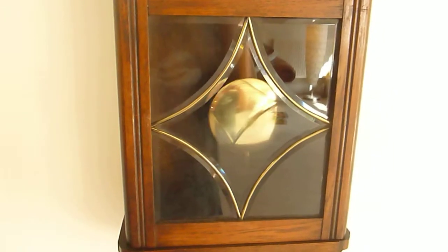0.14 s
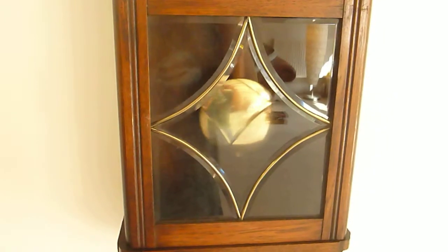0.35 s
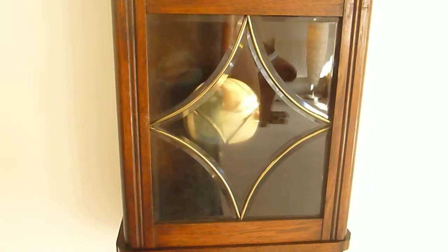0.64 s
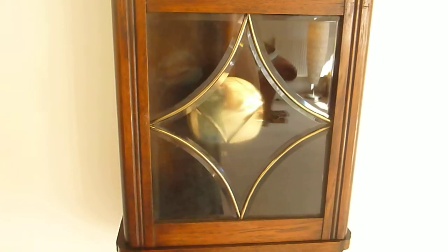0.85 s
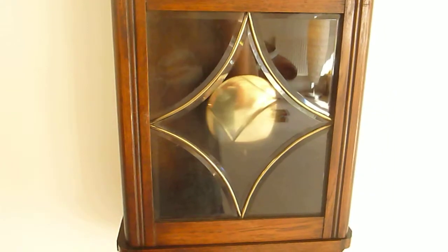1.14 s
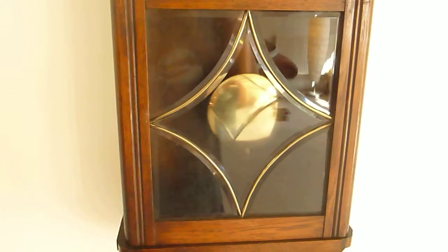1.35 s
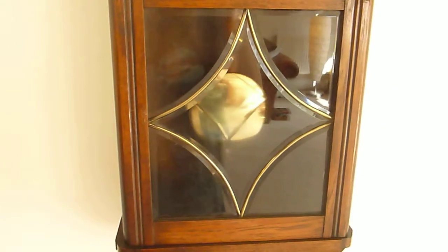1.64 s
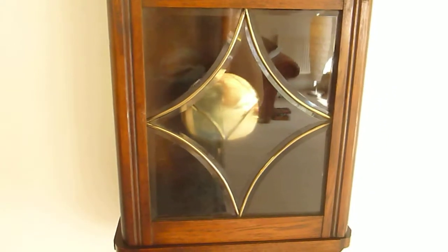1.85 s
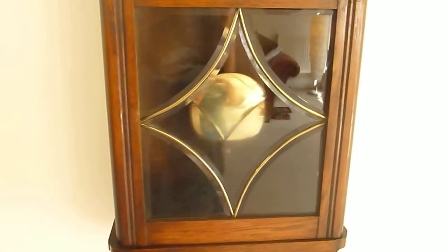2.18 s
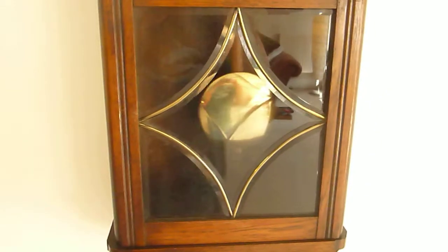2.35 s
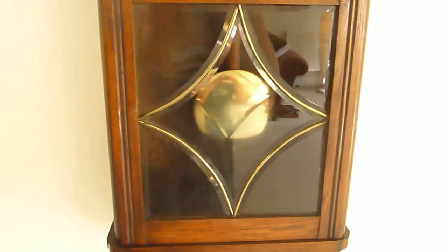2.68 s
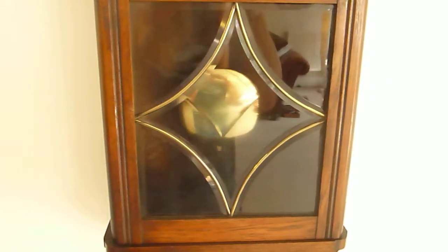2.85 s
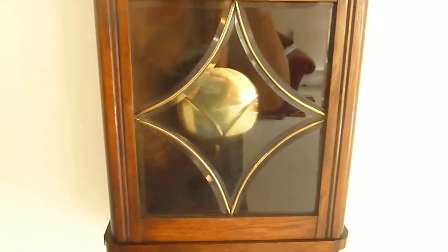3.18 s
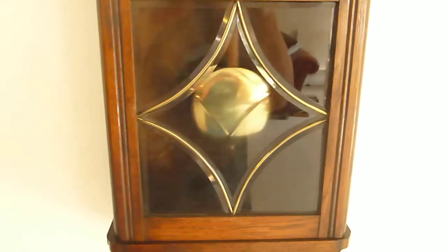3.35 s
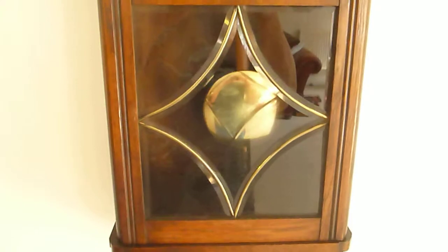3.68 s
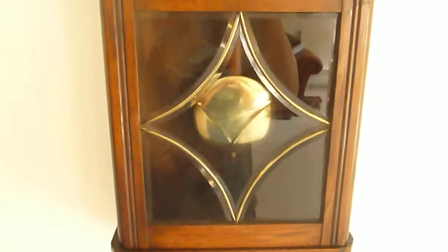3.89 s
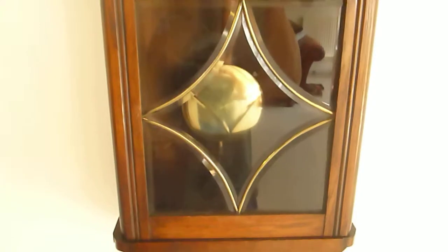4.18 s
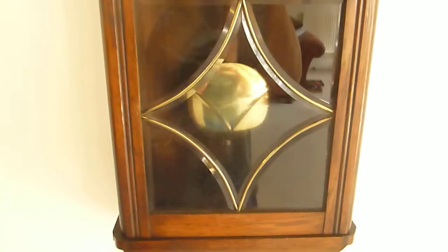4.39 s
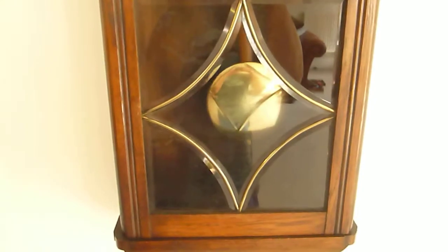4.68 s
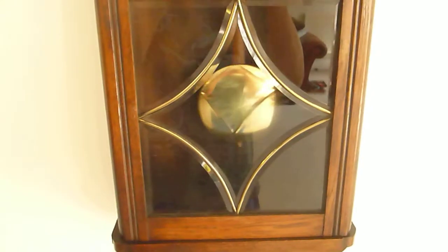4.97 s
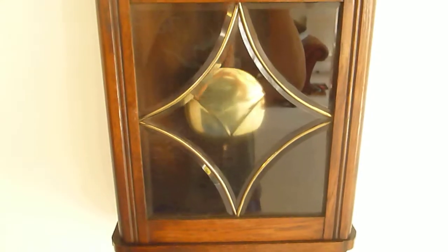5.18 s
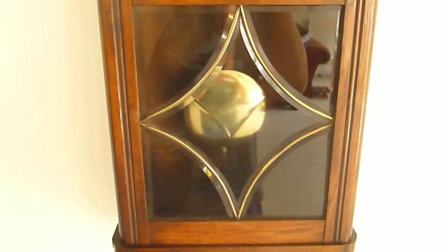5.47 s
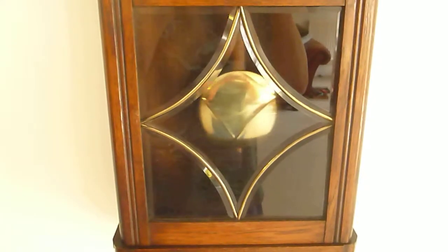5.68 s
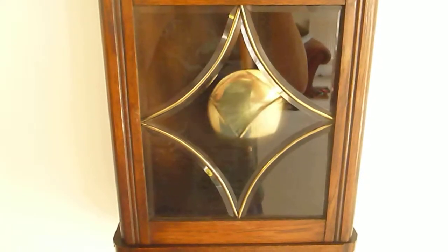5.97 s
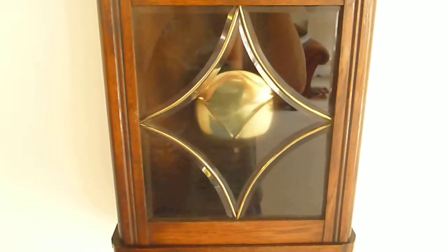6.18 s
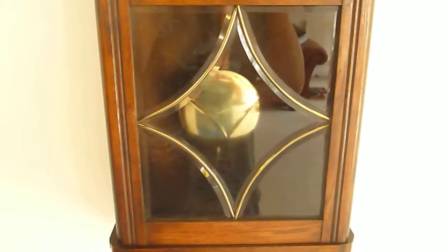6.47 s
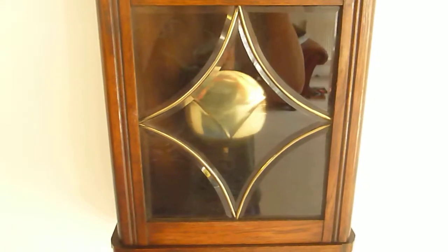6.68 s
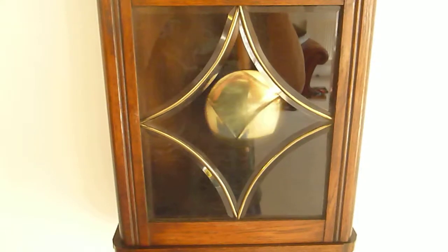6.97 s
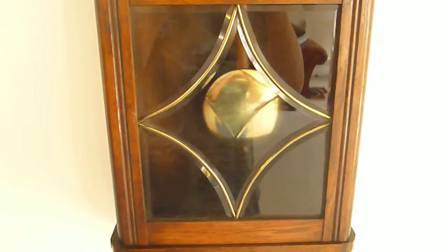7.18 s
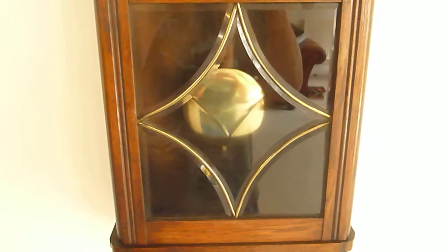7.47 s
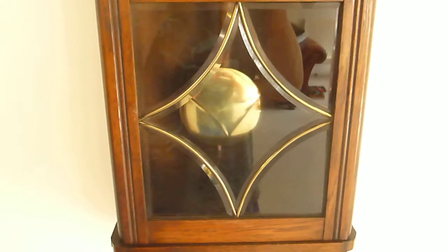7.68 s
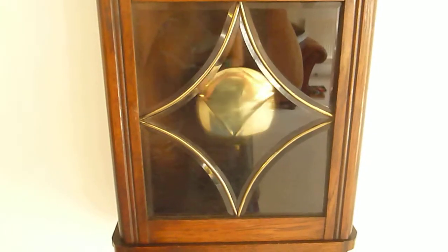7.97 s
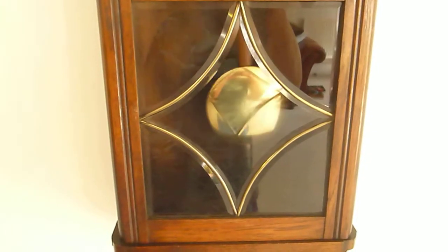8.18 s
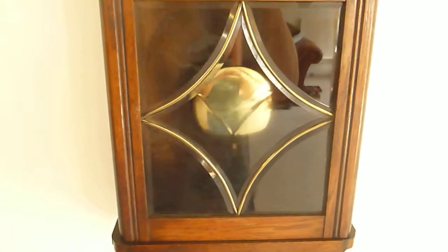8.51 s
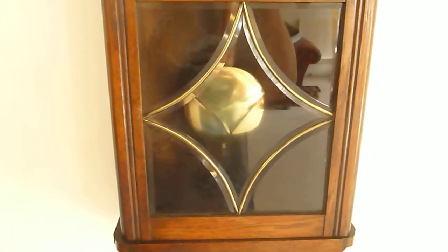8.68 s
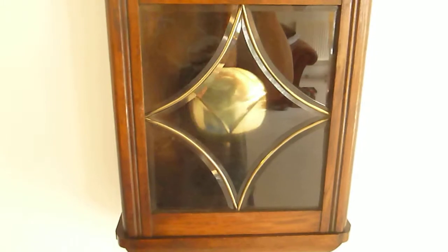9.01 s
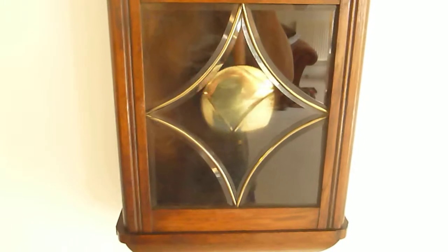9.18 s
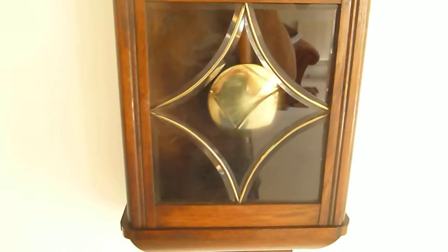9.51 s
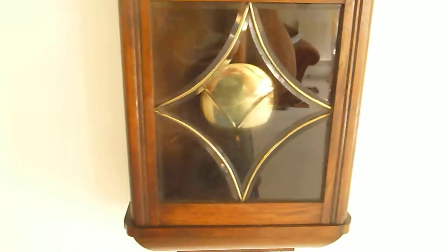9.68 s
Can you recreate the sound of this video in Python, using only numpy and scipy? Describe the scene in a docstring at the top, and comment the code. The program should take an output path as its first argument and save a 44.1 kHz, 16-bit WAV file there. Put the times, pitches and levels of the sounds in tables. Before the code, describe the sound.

Two clocks tick indoors over faint hiss, one a slow wooden tick-tock, the other faster with a thin ring.

```python
"""A wooden pendulum wall clock beats a strong tick and a softer tock in a quiet room.
A smaller, quicker clock ticks nearby with a thin ring, drifting in and out of step with it.
Each beat is an escapement tooth sliding off one pallet and the wheel landing on the other,
ringing movement and case. Under both lie room noise, hiss and a faint hum;
near the end something brushes softly."""
import sys
import numpy as np
from scipy import signal
from scipy.fft import rfft, irfft, next_fast_len
from scipy.io import wavfile

SR = 44100
rng = np.random.default_rng(int(sys.argv[2]) if len(sys.argv) > 2 else 0)


def int16_out(signal):
    """Quantize to a 16-bit WAV file."""
    q = np.round(np.clip(np.atleast_2d(signal).T, -1, 1) * 32767)
    wavfile.write(sys.argv[1], SR, q.astype(np.int16))


N = 434385


def gain_of(db):
    """Decibels to amplitude."""
    return 10 ** (np.asarray(db) / 20)


def unit_rms(x):
    """Scale to rms 1."""
    return x / np.sqrt(np.mean(x ** 2) + 1e-20)


def curve_at(points, hz):
    """Interpolate (freq_hz, value) rows over log frequency."""
    freq_hz, value = np.transpose(points)
    return np.interp(np.log(hz + 1), np.log(freq_hz + 1), value)


def coloured(x, spectrum):
    """Filter by (freq_hz, gain_db) rows."""
    size = next_fast_len(len(x))
    response = gain_of(curve_at(spectrum, np.fft.rfftfreq(size, 1 / SR)))
    return irfft(rfft(x, size) * response, size)[:len(x)]


def drift(max_hz):
    """Slow random wander, rms 1."""
    t = np.arange(N) / SR
    rates_hz = max_hz * rng.random(size=8)
    return unit_rms(sum(np.sin(2 * np.pi * (hz * t + rng.random())) for hz in rates_hz))


def add(mix, start_s, sound):
    """Mix in a sound, cropped at both ends of the mix."""
    start = round(start_s * SR)
    sound = sound[max(-start, 0):]
    part = mix[max(start, 0):][:len(sound)]
    part += sound[:len(part)]


def room_noise(level_db=-52.5):
    """Steady, dull room noise thinning into hiss."""
    # noise floor: freq_hz, density_db
    spectrum = [(20, -8), (70, -5.5), (140, -1), (245, 0), (285, -2), (320, 2), (380, -3.5), (500, -6),
                (1000, -10), (1600, -13.5), (2400, -17.5), (3200, -21), (4800, -24.5), (7100, -27.5)]
    return gain_of(level_db) * unit_rms(coloured(rng.standard_normal(N), spectrum))


def mains_hum(swell_db=0.3):
    """Faint mains and appliance tones, wavering in pitch and level."""
    # tones: pitch_hz, rms_db, waver_hz
    tones = [(55, -70.5, 1.8), (100, -63, 1.1), (120, -73, .8), (627, -78, .5), (797, -71, .6),
             (4388, -90, .4), (6666, -93.5, .3)]
    out = np.zeros(N)
    for pitch_hz, rms_db, waver_hz in tones:
        amplitude = np.sqrt(2) * gain_of(rms_db + swell_db * drift(max_hz=.6))
        cycles = np.cumsum(pitch_hz + waver_hz * drift(max_hz=3)) / SR
        out += amplitude * np.sin(2 * np.pi * cycles)
    return out


def brush(sag_oct_per_s=5.3):
    """Rubbing noise in one broad resonance that sinks as each stroke swells and fades."""
    # strokes: middle_s, half_length_s, level_db, centre_hz, width_oct
    strokes = [(9.495, 0.032, -53, 1460, 0.73), (9.682, 0.11, -57, 925, 0.35),
               (9.83, 0.055, -59.5, 650, 0.98)]
    hz, t, noise = signal.stft(rng.standard_normal(N), SR, nperseg=512)
    mask = 0
    for middle_s, half_s, level_db, centre_hz, width_oct in strokes:
        sag_oct = sag_oct_per_s * np.clip(t - middle_s, -2 * half_s, 2 * half_s)
        offset_oct = np.log2((hz[:, None] + 1) / centre_hz) + sag_oct
        band = np.exp(-.5 * (offset_oct / width_oct) ** 2)
        band /= np.sqrt(np.mean(band ** 2, 0))
        swell = np.exp(-((t - middle_s) / half_s) ** 2)
        mask += gain_of(level_db) * swell * band
    return signal.istft(noise * mask, SR, nperseg=512)[1][:N]


def room_echo(sound, gap_s):
    """Dense reflections fading in after a gap; the bass dies first."""
    # room decay: freq_hz, t60_s
    decay_times = [(300, 0.17), (2000, 0.32), (8000, 0.29)]
    hz, t, noise = signal.stft(rng.standard_normal(len(sound)), SR, nperseg=256)
    decay = gain_of(-60 * t / curve_at(decay_times, hz)[:, None])
    tail = signal.istft(noise * decay, SR, nperseg=256)[1][:len(sound)]
    tail *= np.clip(np.arange(len(tail)) / SR / gap_s - 1, 0, 1)
    return signal.fftconvolve(sound, tail / np.linalg.norm(tail))[:len(sound)]


def escapement(levels, period_s, first_s, limp_s_per_s, jitter_s, uneven_db=.25):
    """Two beats a period, their spacing slowly shifting. Rows: time_s, gain_db, pallet (0 tick, 1 tock)."""
    swing, pallet = np.divmod(np.arange(2 * int(N / SR / period_s + 1)), 2)
    late, strong = rng.standard_normal((len(swing), 2)).T
    time_s = np.take(first_s, pallet) + swing * period_s
    time_s += limp_s_per_s * time_s * (.5 - pallet) + jitter_s * late
    knot_s, tick_db, tock_db = np.transpose(levels)
    gain_db = np.where(pallet, np.interp(time_s, knot_s, tock_db), np.interp(time_s, knot_s, tick_db))
    gain_db += uneven_db * strong
    return np.column_stack([time_s, gain_db, pallet])[time_s < N / SR]


def clock(beats, modes, clatter, landing_db, landing_t60_s, slide_db, slide_s, rise_s, echo_db, gap_s):
    """A tooth slides off, the wheel lands, movement and case ring. Level pairs are (tick, tock)."""
    scatter_db, landing_rise_s = 1.0, 0.0029
    t = np.arange(-SR // 12, SR // 2) / SR  # landing at t = 0
    pitch_hz, t60_s, lag_s, *pallet_db = np.transpose(modes)[:, :, None]
    ring_age_s, landed_s = np.maximum(t - lag_s, 0), np.maximum(t, 0)
    attack = 1 - np.exp(-(ring_age_s / rise_s) ** 2)
    envelopes = attack * gain_of(np.array(pallet_db) - 60 * ring_age_s / t60_s)
    landing = gain_of(-60 * landed_s / landing_t60_s) * (1 - np.exp(-landed_s / landing_rise_s))
    sliding = np.exp(-abs(t) / slide_s)
    out = np.zeros(N)
    for time_s, gain_db, pallet in beats:
        side = round(pallet)
        scatter = gain_of(scatter_db * rng.standard_normal(pitch_hz.shape))  # no two teeth land alike
        partials = np.sin(2 * np.pi * (pitch_hz * t + rng.random(pitch_hz.shape)))
        ring = (envelopes[side] * scatter * partials).sum(0)
        rattle = unit_rms(coloured(rng.standard_normal(len(t)), clatter))
        rattle *= gain_of(landing_db[side]) * landing + gain_of(slide_db[side]) * sliding
        beat = gain_of(gain_db) * (ring + rattle)
        add(out, time_s + t[0], beat + gain_of(echo_db) * room_echo(beat, gap_s))
    return out


def small_clock():
    """Quick, slightly limping ticks; plates and shell ring thinly."""
    # plate and shell modes: pitch_hz, t60_s, lag_s, tick_db, tock_db
    modes = [(921, 0.11, .001, -62, -55), (1025, .07, 0.0013, -60, -51), (1536, 0.11, 0.0018, -61.5, -57),
             (1884, .06, 0.0059, -54, -49.5), (1927, 0.071, 0.0035, -49, -42.5),
             (2054, 0.025, 0.0017, -57.5, -53.5), (2325, 0.13, 0.0045, -60, -55.5),
             (2394, 0.088, 0.0018, -56, -52.5), (2664, 0.056, .001, -59.5, -61),
             (2880, .05, 0.00092, -62, -70), (3870, 0.067, .001, -59, -67), (5280, 0.071, .001, -75, -68),
             (6140, 0.049, 0.0011, -63, -75), (7080, .05, .001, -66.5, -73)]
    # escapement clatter: freq_hz, density_db
    clatter = [(400, -17), (1000, -4.5), (1500, -3), (2200, 1.5), (3200, -15), (4100, -14), (5500, -22.5),
               (7500, -17.5)]
    # beat strength: time_s, tick_db, tock_db
    levels = [(0.2, 1.5, -0.5), (1.1, -1.5, -3), (3.0, 1.5, -2.5), (7.3, 1, -1), (9.8, -1.5, -1)]
    beats = escapement(levels, period_s=0.61282, first_s=(0.2285, 0.5205),
                       limp_s_per_s=-.0001, jitter_s=.0004)
    return clock(beats, modes, clatter, landing_db=(-53.5, -52), landing_t60_s=0.074,
                 slide_db=(-68, -60), slide_s=.03, rise_s=0.0024, echo_db=-6.5, gap_s=0.011)


def wall_clock():
    """Slow pendulum tick-tock; the wooden panels answer after the movement."""
    # movement and case modes: pitch_hz, t60_s, lag_s, tick_db, tock_db
    modes = [(596, 0.083, .009, -49.5, -54.5), (654.6, 0.085, .009, -43, -53.5),
             (714.4, 0.081, 0.0083, -48, -47), (1030, 0.15, .008, -48, -59.5),
             (1094, 0.09, 0.006, -49, -52.5), (1316, 0.042, 0.0061, -61.5, -56),
             (1560, 0.079, 0.0012, -51.5, -51), (1671, 0.08, 0.0012, -46, -54),
             (1782, 0.079, 0.002, -52, -52.5), (1898, .08, 0.0045, -54.5, -56),
             (1985, 0.13, 0.0018, -54.5, -63), (2630, 0.071, .001, -56, -68), (2740, 0.099, .001, -62, -72),
             (3465, .16, .001, -60.5, -77), (3690, 0.13, 0.0011, -62.5, -71.5),
             (3900, .09, .001, -59.5, -74), (5010, 0.06, .001, -71.5, -58.5),
             (5300, 0.07, .001, -70, -68.5), (7100, 0.053, .001, -72, -80)]
    # wheel-train clatter: freq_hz, density_db
    clatter = [(250, -17.5), (650, -4.5), (1200, -1.5), (1750, 1.5), (2300, -9), (3100, -13), (3700, -8.5),
               (4500, -19), (7500, -19.5)]
    # beat strength: time_s, tick_db, tock_db
    levels = [(0, -3, -1), (4.6, -1.5, -0.9), (9.8, -0.6, -2.3)]
    beats = escapement(levels, period_s=1.1536, first_s=(-0.0155, 0.5635),
                       limp_s_per_s=.001, jitter_s=.0005)
    return clock(beats, modes, clatter, landing_db=(-51, -56.5), landing_t60_s=0.15,
                 slide_db=(-57, -62), slide_s=.008, rise_s=0.0016, echo_db=-7.5, gap_s=0.01)


def scene():
    """Both clocks over the quiet room, mono."""
    return (wall_clock() + small_clock() + room_noise() + mains_hum() + brush())[None]


def record(dry):
    """Treble roll-off, steep low-pass, small DC offset."""
    # treble roll-off: freq_hz, gain_db
    roll_off = [(7100, 0), (7600, -4), (8000, -6.5), (8300, -13.5), (8600, -21), (8900, -29)]
    cutoff_hz, dc_offset = 8900, .0072
    dull = coloured(dry[0], roll_off)
    low_pass = signal.firwin(511, cutoff_hz, window=("kaiser", 9), fs=SR)
    return dc_offset + signal.oaconvolve(dull, low_pass, "same")[None]


dry = scene()
out = record(dry)
int16_out(out)
```